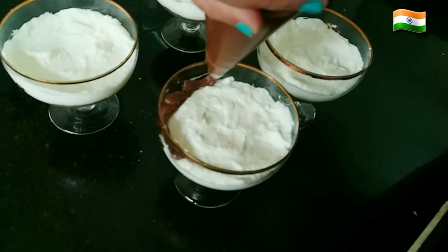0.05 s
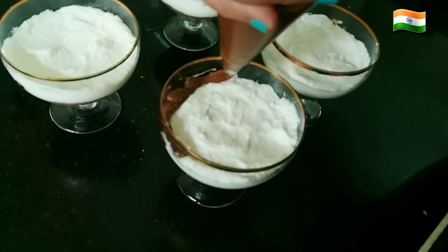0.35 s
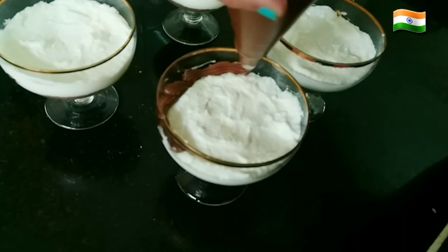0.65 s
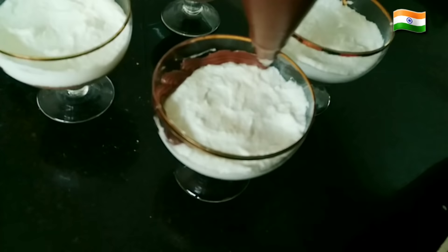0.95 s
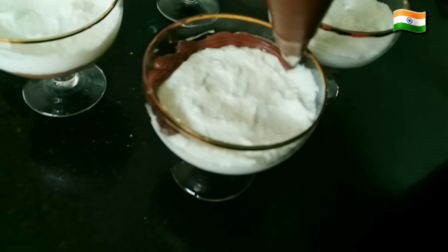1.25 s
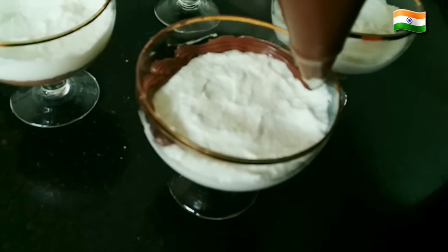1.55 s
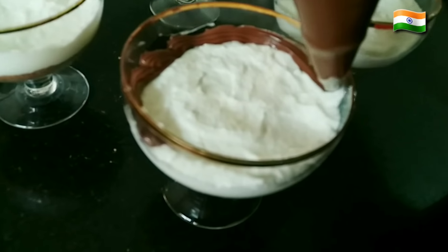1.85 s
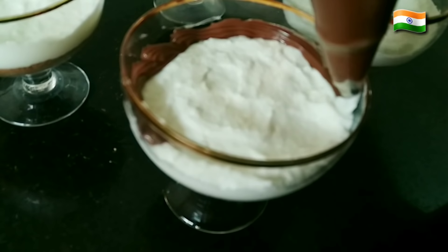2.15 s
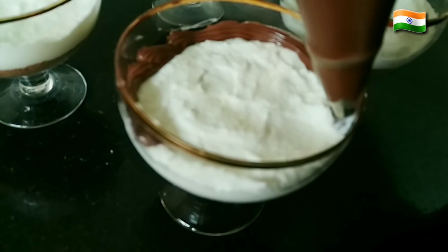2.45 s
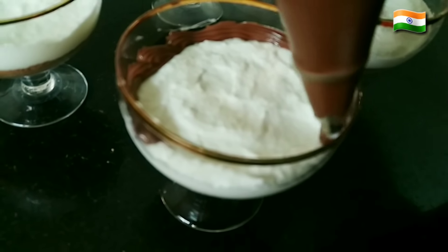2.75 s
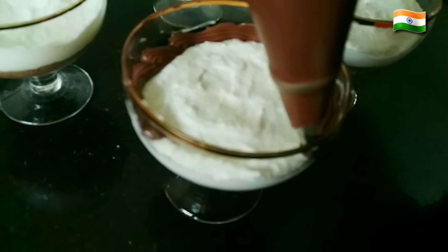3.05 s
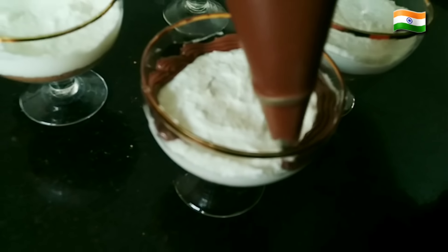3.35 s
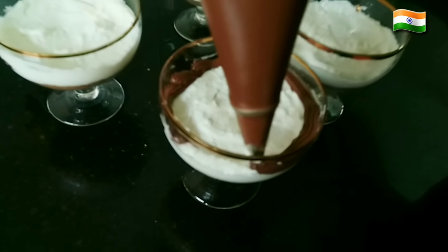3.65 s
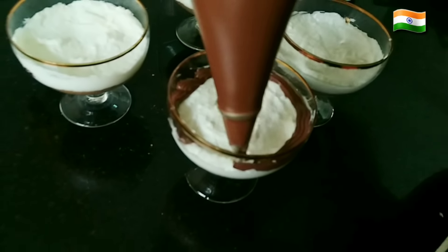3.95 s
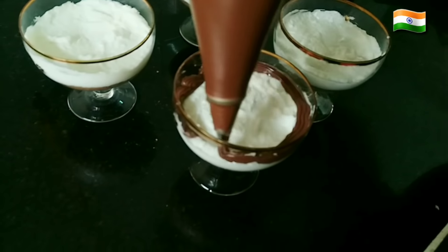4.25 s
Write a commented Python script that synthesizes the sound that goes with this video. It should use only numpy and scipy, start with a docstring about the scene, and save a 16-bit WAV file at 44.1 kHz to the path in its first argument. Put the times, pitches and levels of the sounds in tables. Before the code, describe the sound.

A plastic piping bag crinkles quietly, close to the microphone, as a hand squeezes it. In the first quarter second, fingers rustle faintly on the plastic while the first creases pop. Several short squeezes follow until about 2 seconds, each bringing fine crackle mixed with irregular pops and thin ticks. Sharper snaps stand out near 0.8 seconds and from 1.4 to 1.5 seconds. After 2 seconds the crinkling thins to light, scattered ticks. A few duller pops come just after 3 seconds, a double snap near 3.3, and one sharp snap just after 4, followed by a couple of lighter ticks before the end at about 4.5 seconds. Each snap rings briefly in the small, hard-walled kitchen. Underneath, from start to finish, an appliance motor hums low and steady over a soft, even rush of air.

```python
"""Crackles, pops and ticks of a plastic piping bag, squeezed over a dessert glass.
Fingers rustle on the film as they take hold. Each squeeze makes it crackle, and its creases buckle
one by one: wide folds pop, tight ones tick. The small, hard-walled kitchen rings briefly after each
snap, while a mains-driven motor hums steadily behind, over a low rush of air."""
import sys
import numpy as np
from scipy import signal
from scipy.fft import rfft, irfft
from scipy.io import wavfile

SR = 44100
rng = np.random.default_rng(int(sys.argv[2]) if len(sys.argv) > 2 else 0)


def put_to_file(sound):
    """Save the sound as 16-bit audio at rate SR, in the file named by the first command-line argument."""
    columns = np.atleast_2d(sound).T  # one column per channel
    safe = np.clip(columns, -1, 1)
    whole_steps = np.round(safe * 32767)
    wavfile.write(sys.argv[1], SR, whole_steps.astype(np.int16))


N = 197639

# Colour of the moving air. Each row: frequency in Hz, relative level in dB.
AIR_COLOUR = [(25, -30), (48, -28), (70, -13), (132, -18), (175, -5.5), (245, 1), (400, -7.5), (520, -14.5),
              (800, -20), (1350, -26.5), (2800, -33.5), (4500, -44), (7300, -52.5), (8500, -43.5),
              (14000, -45)]
# Narrow peaks in the background rush: a low boom and a faint high ring.
# Each row: centre in Hz, width in Hz, boost in dB.
AIR_RESONANCES = [(108.1, 16, 17), (2946, 110, 7.5)]
# The motor's hum. Each row: frequency in Hz, rms level in dB.
MOTOR_TONES = [(99.9, -66.5), (146.3, -65.5), (177, -67.5), (199.5, -73), (249.8, -77), (299.8, -53.5),
               (349.7, -65.5), (435.6, -71.5), (445.3, -64), (486, -75), (659, -79.5), (1583, -80)]
# Length of the kitchen's reverb. Each row: frequency in Hz, seconds to fall by 60 dB.
REVERB_DECAY = [(400, 1.6), (2500, 0.5), (5000, 0.59), (9000, 0.3), (14000, 0.29)]
# Colour of that reverb. Each row: frequency in Hz, relative level in dB.
REVERB_COLOUR = [(400, 8), (1000, -2), (1800, 1), (2700, -4), (4600, 0), (7000, -0.5), (9000, 4.5),
                 (14000, 5)]
# Envelope of the sliding fingers. Each row: time in seconds, level in dB.
SLIDE_ENVELOPE = [(0, -60), (.07, -63), (.15, -57), (.23, -85), (.4, -100)]
# Resonances of the rubbed film. Each row: centre in Hz, width in Hz, relative level in dB.
SLIDE_RESONANCES = [(2700, 220, -0.16), (4250, 1200, -1.8)]
# Squeezes of the hand. Each row: start in seconds, hold in seconds, crackle level in dB.
HAND_SQUEEZES = [(0, 0.11, -56.5), (0.367, 0.14, -66.5), (0.791, .07, -56.5), (1.091, .11, -59),
                 (1.371, .15, -55), (1.806, .18, -61), (3.021, 0.31, -74)]
# Colour of the crackling film. Each row: frequency in Hz, relative level in dB.
FILM_COLOUR = [(200, -23.5), (550, -6.5), (1000, -0.5), (1350, -5), (1700, -1.5), (2800, -3), (3900, -4),
               (6000, -8), (7400, -12), (8600, -5.5), (9600, -8.5), (11200, -8.5), (14000, -14.5)]
# The creases that stand out. Each row: start in seconds, body level in dB over 5 ms,
# treble in dB against the body, ring of the film in Hz, buckling time in seconds.
CREASE_SNAPS = [(.063, -50, 4, 2860, .004), (.0906, -46, -3.5, 1710, 0.0022),
                (.111, -54, 6.5, 2310, 0.0011), (0.1262, -45.5, 2, 2930, .0015),
                (.1992, -56.5, -2.5, 2370, 0.0018), (.256, -58, -0.5, 2900, 0.0026),
                (0.271, -58, 1.5, 5300, 0.0011), (0.2922, -45.5, 3, 2280, .003),
                (.362, -48.5, -13, 1730, 0.0017), (.372, -53.5, 1, 1700, 0.0021),
                (.3863, -43.5, -4, 3130, 0.0024), (.442, -55.5, 4, 2900, 0.0026),
                (.453, -48, 5.5, 3170, 0.0012), (0.4582, -47.5, -7, 2840, .001),
                (0.51, -47, -4, 2160, 0.00083), (0.555, -43, -4, 5040, .001),
                (0.5898, -50.5, -3.5, 5230, 0.001), (0.6531, -47, -6, 2450, 0.0039),
                (.6688, -55.5, -8, 1500, 0.0032), (0.7587, -55, -27, 995, 0.00058),
                (.7645, -34, -3, 3650, 0.002), (0.7817, -46, -19, 1510, 0.00094),
                (.798, -49, -2, 1800, 0.0032), (0.806, -49, -3, 3700, .002), (.839, -41.5, 2, 1540, 0.0019),
                (0.886, -53.5, -10, 860, 0.00075), (0.9085, -53.5, -2, 2610, 0.0026),
                (0.984, -47, -3.5, 2190, 0.005), (1.0525, -51, -0.5, 1870, .005),
                (1.1006, -48, -6, 2520, .0023), (1.113, -46.5, -31, 2810, 0.0012),
                (1.1328, -55, 0, 2300, .0026), (1.1462, -45.5, -2.5, 2800, .0025),
                (1.2591, -57, 4.5, 1800, 0.0012), (1.307, -54.5, 6.5, 2200, 0.0022),
                (1.3383, -48.5, 1.5, 1970, 0.0017), (1.358, -38.5, -7, 2540, 0.0021),
                (1.3694, -45.5, -16, 2360, 0.0022), (1.4073, -54.5, 7.5, 2900, .004),
                (1.428, -41, 1.5, 2370, .003), (1.4566, -49.5, 0.5, 2940, 0.0033),
                (1.4653, -48, -3, 2580, 0.0033), (1.5035, -37, -3.5, 3000, 0.0027),
                (1.5286, -43, -5, 2190, 0.0018), (1.6131, -57.5, -1.5, 780, 0.0035),
                (1.7212, -55.5, -30, 2290, 0.0034), (1.7571, -59.5, 5.5, 2500, 0.0061),
                (1.7827, -43, -11, 1940, 0.0018), (1.8134, -52, 2, 3200, 0.0022),
                (1.851, -51, -31, 2220, 0.0051), (1.8946, -49, -9, 3340, 0.0008),
                (1.9502, -50, -3, 2190, 0.0034), (1.978, -53, -8, 2560, 0.0029),
                (1.9962, -49, -7.5, 2420, 0.0024), (2.2416, -52, 3.5, 3300, .0018),
                (2.2846, -53, -7, 2560, 0.0026), (2.368, -58.5, 3, 3050, .002),
                (2.622, -56.5, -13.5, 2440, 0.0018), (2.7393, -56, -15, 3160, 0.0027),
                (2.7698, -54, -19, 1820, 0.0034), (2.7809, -49.5, -0.5, 2700, 0.0015),
                (2.8077, -69, 18.5, 5070, 0.0033), (2.8446, -56, -18, 2370, .002),
                (2.9636, -53.5, -17, 1380, 0.0027), (3.035, -43.5, -27, 2140, 0.0019),
                (3.079, -52, -15, 2403, 0.0013), (3.0972, -45, -17, 2260, 0.0019),
                (3.2262, -55.5, -24, 2380, .002), (3.3208, -42, -0.5, 2500, .0026),
                (3.3354, -44, -1, 2650, 0.0019), (3.4053, -55, -9, 2400, 0.0033),
                (3.514, -55.5, -29, 1410, 0.0026), (3.5346, -55.5, -13, 2700, .003),
                (3.5902, -54.5, -5, 2000, 0.0022), (3.619, -46, -5.5, 4100, 0.0019),
                (3.671, -50, -33, 1270, 0.00085), (3.723, -50, -9.5, 2700, 0.0012),
                (3.8632, -51.5, -15, 1300, 0.002), (3.8834, -62, 4, 1800, 0.0041),
                (4.0504, -36.5, -4.5, 3200, 0.0025), (4.1676, -46, -2.5, 2700, 0.00034),
                (4.373, -60, -15, 3070, 0.0022)]

FOLD_HZ = 2500  # ring of a typical fold


def gain_of(db):
    """Decibels to amplitude."""
    return 10 ** (np.asarray(db) / 20)


def unit_rms(x):
    """Scales to rms 1."""
    return x / np.sqrt(np.mean(x ** 2) + 1e-20)


def curve_at(points, hz):
    """Reads a curve on a log-frequency axis."""
    point_hz, value = np.transpose(points)
    return np.interp(np.log(hz + 1), np.log(point_hz + 1), value)


def add(mix, start_s, sound):
    """Drops a sound into the mix."""
    part = mix[max(round(start_s * SR), 0):][:len(sound)]
    part += sound[:len(part)]


def bell(hz, centre_hz, width_hz):
    """A resonance curve of height 1."""
    return 1 / (1 + (2 * (hz - centre_hz) / width_hz) ** 2)


def ringing_eq(db):
    """A minimum-phase EQ with this curve: sharp attack, ring afterwards."""
    log_gain = np.log(gain_of(np.r_[db, db[-2:0:-1]]))
    return np.exp(np.conj(signal.hilbert(log_gain)))[:len(db)]


def drift(rate_hz):
    """Random wander of rms 1, mostly slower than rate_hz."""
    hz = np.fft.rfftfreq(N, 1 / SR)
    lowpass = (hz > 0) / (1 + (hz / rate_hz) ** 4)
    return unit_rms(irfft(rfft(rng.standard_normal(N)) * lowpass, N))


def air_rush(level_db=-51.5, swell_db=0.5):
    """A low, even bed of moving air, with a boom and a faint high ring."""
    hz = np.fft.rfftfreq(N, 1 / SR)
    peaks_db = sum(db * bell(hz, centre, width) for centre, width, db in AIR_RESONANCES)
    rush = irfft(rfft(rng.standard_normal(N)) * gain_of(curve_at(AIR_COLOUR, hz) + peaks_db), N)
    return gain_of(level_db + swell_db * drift(4.2)) * unit_rms(rush)


def motor_hum(waver=0.28, sway_radians=0.22):
    """Mains harmonics and rotor tones waver a little; the close pair near 440 Hz beats."""
    t, hum = np.arange(N) / SR, np.zeros(N)
    for hz, db in MOTOR_TONES:
        level = gain_of(db) * (1 + waver * drift(2.65))
        hum += level * np.sin(2 * np.pi * (hz * t + rng.random()) + sway_radians * drift(0.71))
    return np.sqrt(2) * hum


def kitchen_reverb(x, wet_db=-6, build_s=0.00054):
    """Dense reflections from counter and walls, each band dying at its own speed."""
    attack = 1 - np.exp(-(np.arange(SR) / SR / build_s) ** 2)
    hz, t, bands = signal.stft(rng.standard_normal(SR) * attack, SR, nperseg=256)
    fade_db = -60 * t / curve_at(REVERB_DECAY, hz)[:, None]
    colour_db = curve_at(REVERB_COLOUR, hz)[:, None]
    _, tail = signal.istft(bands * gain_of(fade_db + colour_db), SR, nperseg=256)
    return gain_of(wet_db) * signal.fftconvolve(x, tail / np.linalg.norm(tail))[:N]


def finger_slide(rough_db=2.5):
    """A brief, uneven rustle of skin on plastic as the fingers take hold."""
    t, hz = np.arange(N) / SR, np.fft.rfftfreq(N, 1 / SR)
    colour = sum(gain_of(db) * bell(hz, centre, width) for centre, width, db in SLIDE_RESONANCES)
    friction = rng.standard_normal(N) * gain_of(rough_db * drift(170))
    rubbing = unit_rms(irfft(rfft(friction) * colour, N))
    return rubbing * gain_of(np.interp(t, *np.transpose(SLIDE_ENVELOPE)))


def grip(tighten_db_per_s=320, relax_db_per_s=130, resting_db=-76.5):
    """The crackle's envelope in dB: each squeeze tightens, holds and relaxes to a light resting hold."""
    t, power = np.arange(N) / SR, gain_of(resting_db) ** 2
    for start, hold, db in HAND_SQUEEZES:
        attack_db = tighten_db_per_s * np.maximum(start - t, 0)
        release_db = relax_db_per_s * np.maximum(t - start - hold, 0)
        power = power + gain_of(db - attack_db - release_db) ** 2
    return 10 * np.log10(power)


def crackle(per_s=190, crowding=0.55, spread_db=6, grain_s=0.0021, trim_db=-3, rings=12, size=1024):
    """Tiny wrinkles slip, louder and more often as the hand tightens, each with its own ring."""
    t, hz = np.arange(size) / SR, np.fft.rfftfreq(size, 1 / SR)
    grip_db = grip()
    rate = per_s * gain_of(crowding * (grip_db - grip_db.mean()))
    clicks = (rng.random(N) < rate / SR) / np.sqrt(rate)  # even power at any density
    clicks *= gain_of(spread_db * np.minimum(rng.exponential(1, N), 3))
    wrinkle, out = rng.integers(0, rings, N), np.zeros(N)
    for k, ring_hz in enumerate(np.geomspace(1900, 5200, rings)):
        colour = ringing_eq(curve_at(FILM_COLOUR, hz) + 8 * bell(hz, ring_hz, width_hz=1000))
        burst = rng.standard_normal(size) * np.exp(-t / grain_s)
        grain = unit_rms(irfft(rfft(burst) * colour))
        out += signal.oaconvolve(clicks * (wrinkle == k), grain)[:N]
    return unit_rms(out) * gain_of(trim_db + grip_db)


def balance_bands(spectrum, hz, target_db, size, window_s=0.005):
    """Sets each snap's pop, body and treble to their given levels."""
    bands = [(hz > low) & (hz < high) for low, high in [(550, 1400), (1400, 6000), (6000, 14500)]]
    for _ in range(2):  # the EQ slopes spill across bands, so a second pass lands closer
        energy = np.array([2 * np.sum(abs(spectrum[band]) ** 2) / size for band in bands])
        pop, body, treble = target_db - 10 * np.log10(energy / (window_s * SR))
        eq_db = curve_at([(1000, pop), (1800, body), (3000, body), (7500, treble)], hz)
        spectrum = spectrum * ringing_eq(eq_db)
    return spectrum


def crease(body_db, treble_db, ring_hz, buckle_s, ring_db=8, rough_db=2.9, size=2048):
    """A fold gives way in a quick run of slips; the film around it rings for a few cycles."""
    t, hz = np.arange(size) / SR, np.fft.rfftfreq(size, 1 / SR)
    buckle = np.exp(-(t / (1.74 * buckle_s)) ** 3)
    flutter = 0.37 * np.exp(-t / (4.5 * buckle_s))
    slips = rng.standard_normal(size) * gain_of(rough_db * rng.standard_normal(size)) * (buckle + flutter)
    slips[0] -= 4  # the opening tick
    colour = ringing_eq(curve_at(FILM_COLOUR, hz) + ring_db * bell(hz, ring_hz, ring_hz / 3))
    pop_db = -10.5 - 11.5 * np.log2(ring_hz / FOLD_HZ)  # wide folds ring low and pop, tight ones tick
    target_db = body_db + np.array([pop_db, 0, treble_db])
    return irfft(balance_bands(rfft(slips) * colour, hz, target_db, size))


def small_creases(level_db=-60, grip_follow=0.54, crowding=0.5, count=20):
    """Lesser folds give way at random moments, harder and more often under a tight grip."""
    out, grip_db = np.zeros(N), grip()
    strain = np.cumsum(gain_of(crowding * grip_db))
    for k, (timing, strength, brightness, pitch) in enumerate(rng.uniform(-1.1, 1.1, (count, 4))):
        onset = np.searchsorted(strain, strain[-1] * (k + 0.5 + timing / 2.2) / count)
        body_db = level_db + grip_follow * (grip_db[onset] - grip_db.mean()) + 2 * strength
        ring_hz = FOLD_HZ * 2 ** (0.13 * pitch)
        snap = crease(body_db, treble_db=-6 + 7 * brightness, ring_hz=ring_hz, buckle_s=0.0034)
        add(out, onset / SR, snap)
    return out


def big_creases():
    """The distinct snaps up front, with fresh slips on every call."""
    out = np.zeros(N)
    for start_s, *fold in CREASE_SNAPS:
        add(out, start_s, crease(*fold))
    return out


def mic_resonance(x, ring_hz=2850, width_hz=200, ring_db=5, size=4096):
    """A narrow microphone resonance adds a short ring to every snap."""
    hz = np.fft.rfftfreq(size, 1 / SR)
    ring = irfft(ringing_eq(ring_db * bell(hz, ring_hz, width_hz)))
    return signal.oaconvolve(x, ring)[:N]


def scene(walls=2, bag_db=-0.38):
    """The bag close by and its echo, over a bed of hum and air, in mono."""
    rustle = crackle() + small_creases() + finger_slide()
    # crumpled film radiates differently in each direction, so every wall returns its own version of a snap
    echo = sum(kitchen_reverb(big_creases() + rustle) for _ in range(walls)) / np.sqrt(walls)
    bag = gain_of(bag_db) * mic_resonance(big_creases() + rustle + echo)
    return (bag + motor_hum() + air_rush())[None]


def record(dry, cutoff_hz=14250):
    """A steep low-pass takes off the very top."""
    lowpass = signal.firwin(401, cutoff_hz, window=("kaiser", 7), fs=SR)
    return signal.oaconvolve(dry, lowpass[None], "same")


dry = scene()
out = record(dry)
put_to_file(out)
```